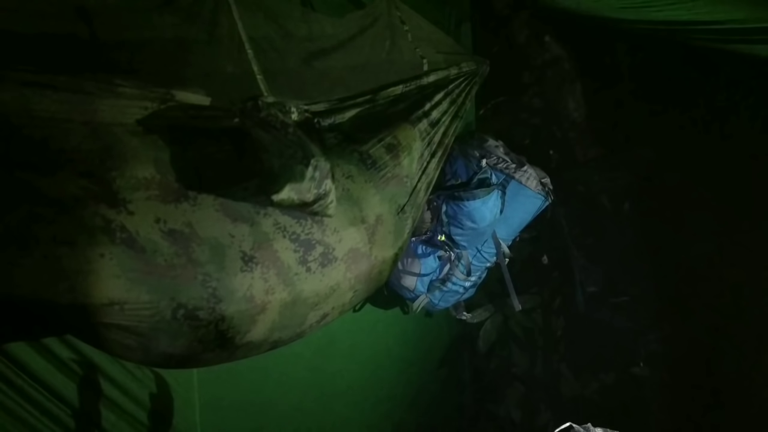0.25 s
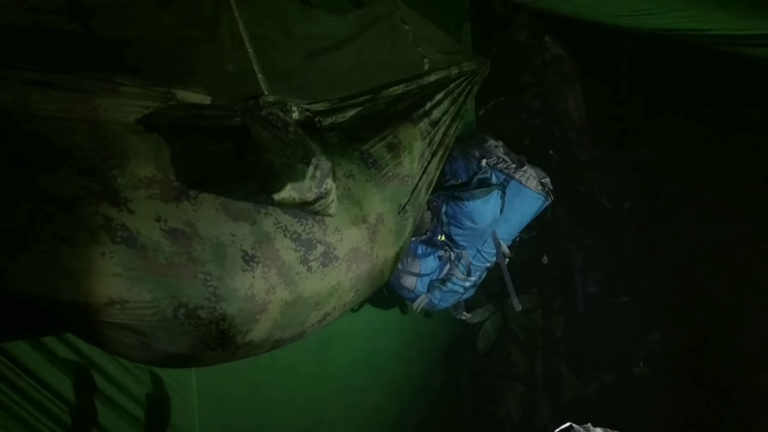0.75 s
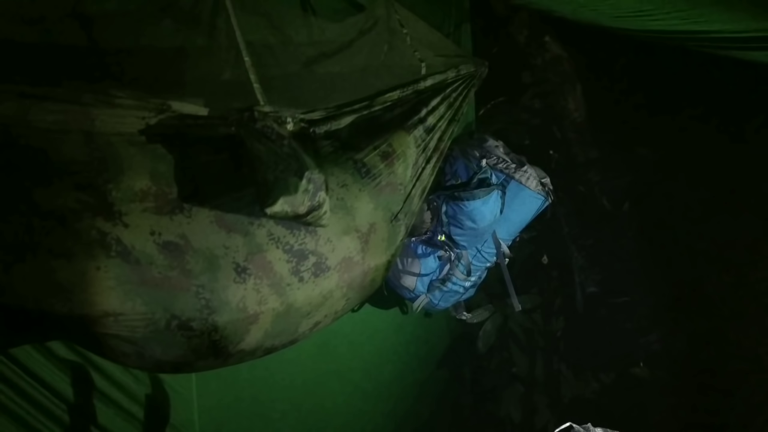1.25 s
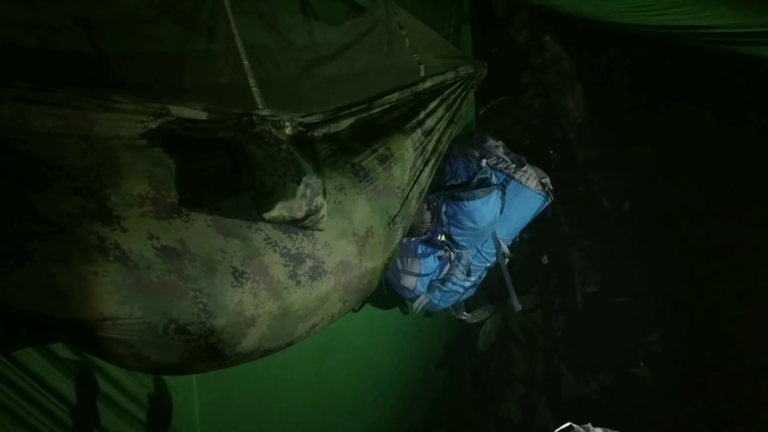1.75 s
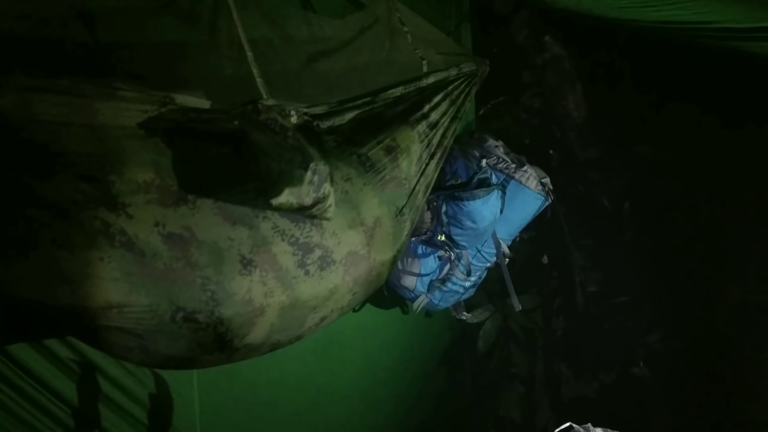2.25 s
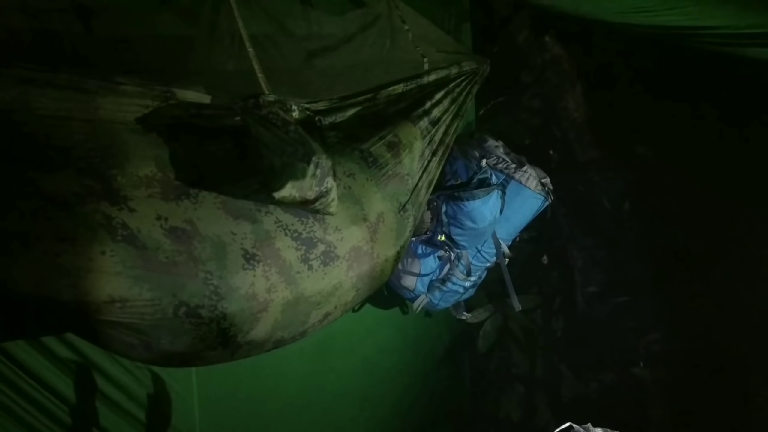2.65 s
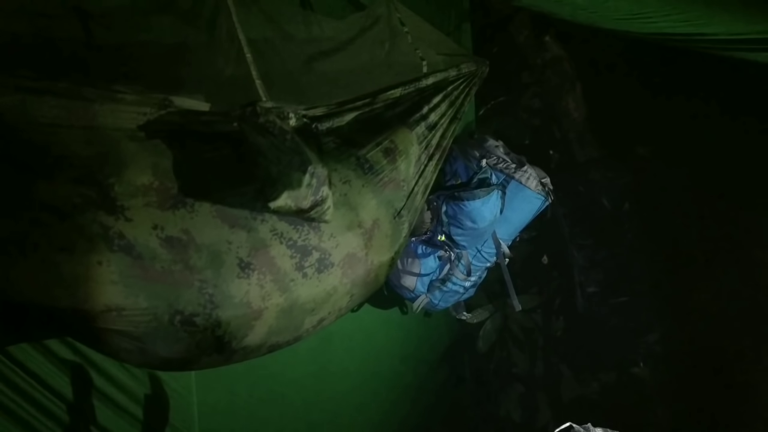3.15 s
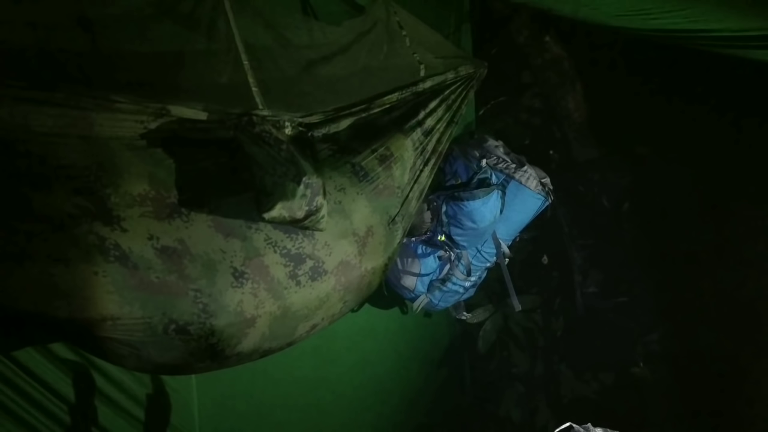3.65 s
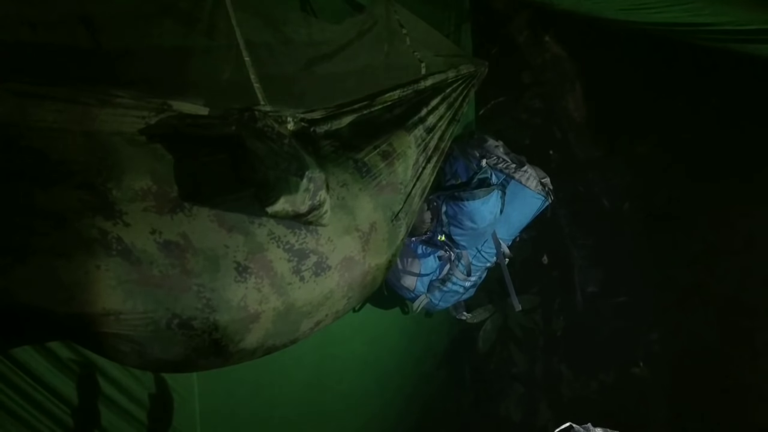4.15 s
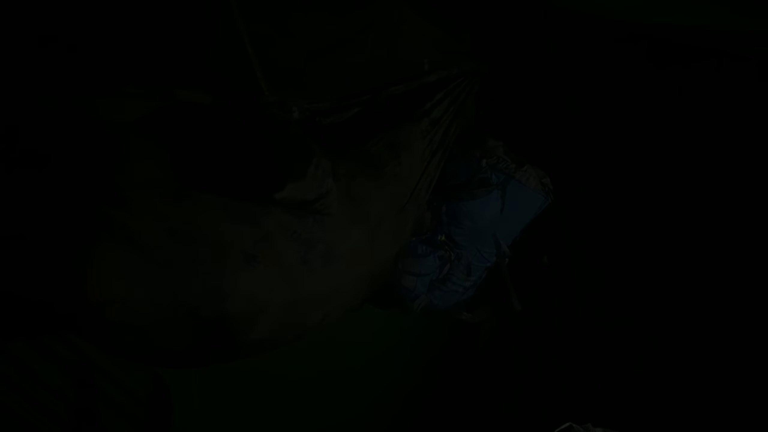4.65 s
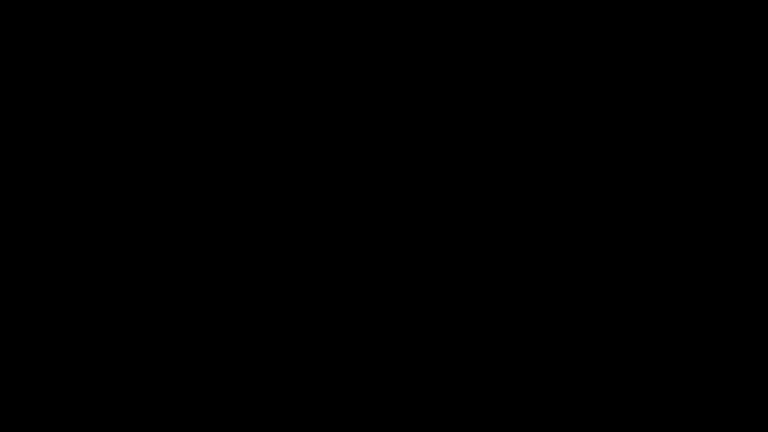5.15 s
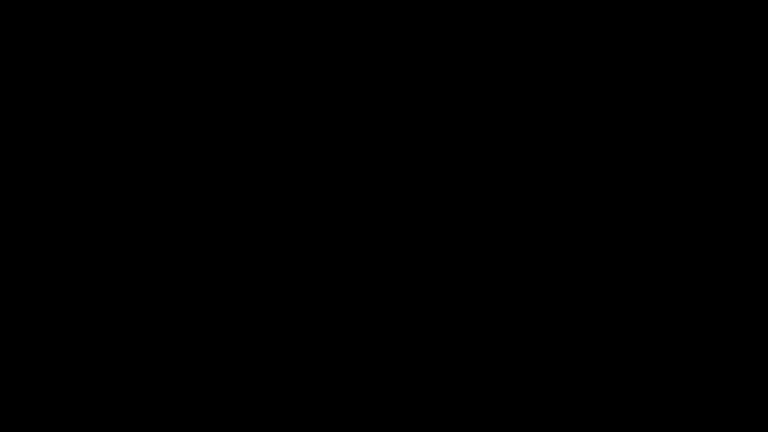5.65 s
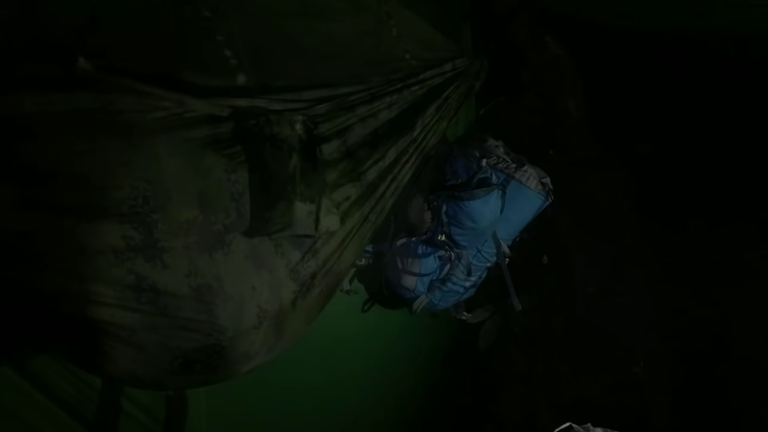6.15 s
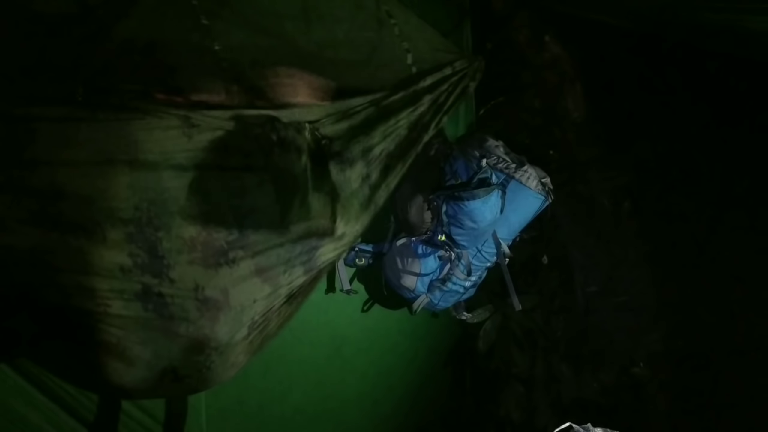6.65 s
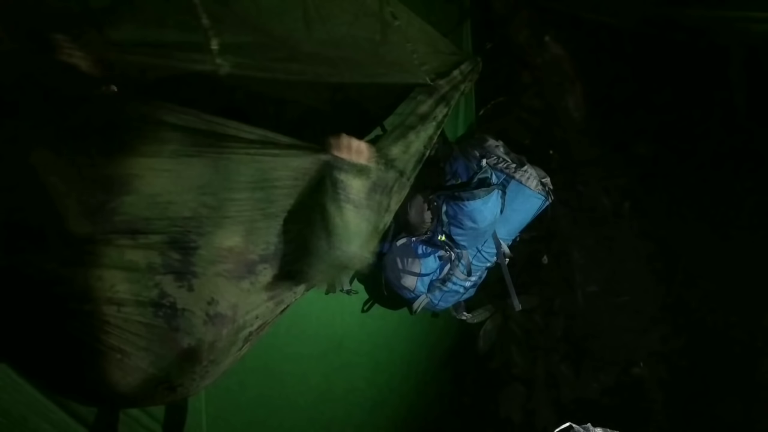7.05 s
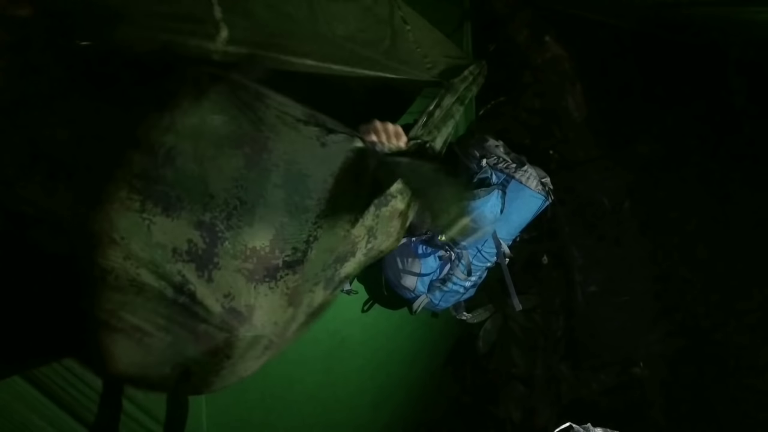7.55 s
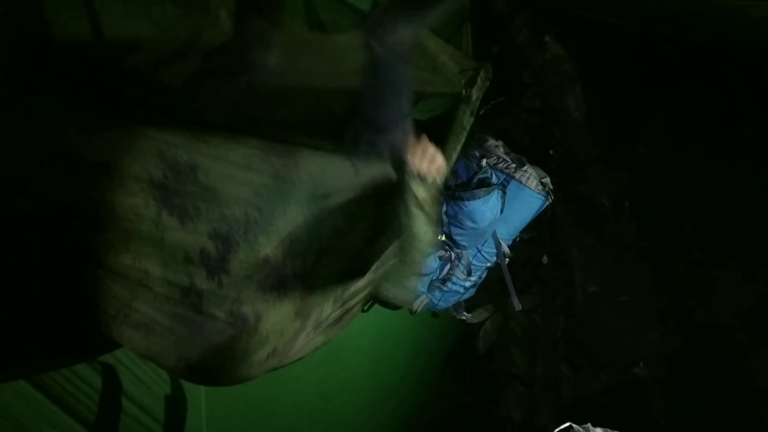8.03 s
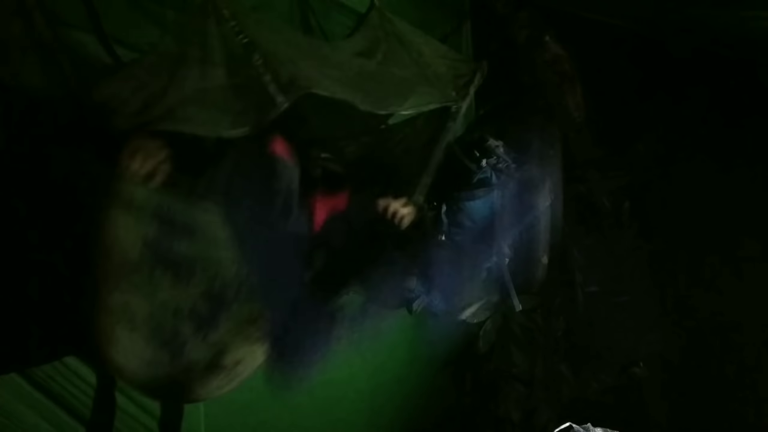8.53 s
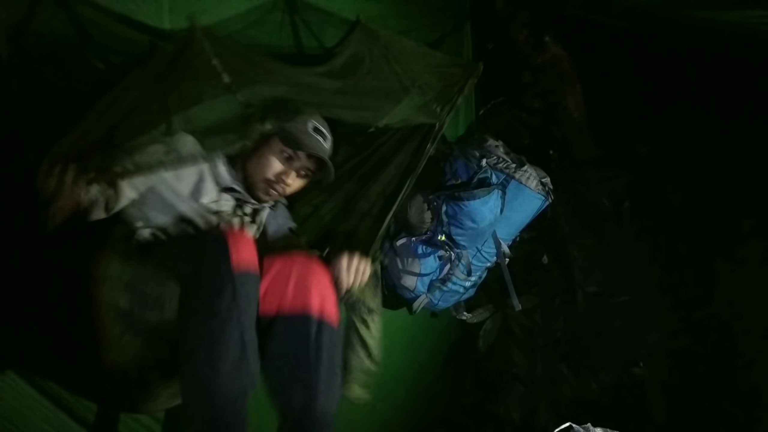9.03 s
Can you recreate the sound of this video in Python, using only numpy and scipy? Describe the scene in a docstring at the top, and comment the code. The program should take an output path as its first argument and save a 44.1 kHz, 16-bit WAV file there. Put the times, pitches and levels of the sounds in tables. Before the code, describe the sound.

A near cricket chirps over a steady insect chorus in a night forest; later someone climbs out of a swishing nylon hammock.

```python
"""A near cricket chirps in threes, one tone per wing stroke, in a forest camp at night.
Behind it: far crickets, fast-buzzing katydids, insect lisps, wide hiss, air, faint hum and rumble.
Drops tick on the leaves and the tarp. Towards the end someone climbs out of a nylon hammock:
the cloth swishes, flaps and thumps taut, the cord groans, the rigging snaps."""
import sys
import numpy as np
from scipy import signal
from scipy.fft import rfft, irfft, next_fast_len
from scipy.io import wavfile

SR = 44100
rng = np.random.default_rng(int(sys.argv[2]) if len(sys.argv) > 2 else 0)


def generate_wav(signal):
    """Clip the signal to [-1, 1] and save it as 16-bit WAV at the path in sys.argv[1]."""
    frames = np.transpose(np.atleast_2d(signal))
    scaled = np.clip(frames, -1, 1) * 32767
    pcm = np.round(scaled).astype(np.int16)
    wavfile.write(sys.argv[1], SR, pcm)


N = 409684
TIME_S = np.arange(N) / SR

# near cricket's wing stroke: offset_s, amplitude, pitch_hz
WING_STROKE = [(-.0095, 0, 5520), (-.005, .35, 5400), (-.0028, .92, 5290), (0, 1, 5230), (.003, .75, 5050),
               (.007, .5, 4900), (.011, 0, 4780)]
# runs of chirps, each chirp timed at its last stroke: first_s, last_s, peak_db, opening_stroke_rel_db
CHIRP_RUNS = [(.025, .257, -41.5, 0), (1.274, 1.274, -41.5, -6), (1.469, 2.627, -41.7, -2),
              (2.899, 3.830, -42.2, -4.5), (5.508, 5.741, -39, -11), (5.971, 6.657, -41.7, 0),
              (6.848, 7.537, -43, -1), (7.805, 8.037, -43, -10), (8.231, 8.231, -45, -22)]
STROKE_GAP_S, CHIRP_GAP_S = .0345, .231

# insect spectra: freq_hz, density_db
KATYDID_SPECTRUM = [(7400, -50), (8100, -7.5), (8700, -6), (9100, -7), (9450, -4), (9800, -6),
                    (10150, -3.5), (10400, -7.5), (10650, -12.5), (11300, -44)]
CHORUS_SPECTRUM = [(4000, -44), (4300, 1.5), (4600, -5.5), (4950, -9), (5300, -4), (5500, 5.5), (5750, -39)]
HIGH_CRICKET_SPECTRUM = [(5800, -13), (6100, -0.5), (6250, -2), (6350, -4.5), (6550, 1), (6700, -8),
                         (6850, 0.5), (7300, -33)]
LOW_CRICKET_SPECTRUM = [(2450, -40), (2750, -5), (2980, -3.5), (3120, -5.5), (3225, 5.5), (3310, -21),
                        (3550, -43)]
# far cricket levels, before swells and surge: time_s, level_db
CHORUS_LEVELS = [(0, -59.5), (1.0, -64.5), (1.3, -61), (3.8, -60.5), (4.1, -62), (4.9, -63), (5.3, -58.5),
                 (6.0, -60), (8.4, -60.5), (9.29, -63.5)]
HIGH_CRICKET_LEVELS = [(0, -64), (1.8, -63.5), (2.75, -62), (4.4, -64.5), (6.6, -62), (9.29, -64.5)]
LOW_CRICKET_LEVELS = [(0, -67), (4.4, -69), (4.8, -105), (6.2, -98), (6.6, -66.5), (7.2, -57.5), (8.3, -58),
                      (9.29, -58.5)]
# chorus beats while the near cricket rests: time_s
REST_BEATS = [.54, 4.43, 4.87, 5.2, 9.19, 9.42]

# background spectra: freq_hz, density_db
WIDE_HISS_SPECTRUM = [(150, 5.5), (500, 1.5), (1500, 2), (3500, 4.5), (5000, -20), (8000, -0.5),
                      (12000, -28), (15500, 10.5)]
AIR_SPECTRUM = [(30, -31), (110, -7.5), (220, 5.5), (310, 3.5), (420, -2), (560, 1), (900, -1),
                (2000, -1.5), (4000, -3), (7500, 0.5), (11000, -2.5), (12500, -7), (15500, -11)]
HUM_SPECTRUM = [(140, -28), (190, -9), (225, -3), (260, -7), (340, -18)]
RUMBLE_SPECTRUM = [(20, -52), (42, -22), (60, -15.5), (80, 0), (100, -2.5), (140, -8), (200, -17),
                   (400, -28.5)]
# background levels: time_s, relative_db
HUM_LEVELS = [(0, -87.5), (4.3, -84), (4.8, -75.5), (5.7, -73.5), (6.4, -83.5), (8.0, -73.5), (8.4, -70.5),
              (9.29, -70.5)]
RUMBLE_LEVELS = [(0, -69.5), (2.05, -70), (2.4, -75), (4.2, -72.5), (5.15, -100), (6.0, -100), (6.95, -77),
                 (7.2, -64), (8.1, -73), (9.29, -71)]

# drops and small twigs: start_s, knock_rel_db, knock_hz, snap_rel_db
DROPS = [(.0877, -65, 890, -61), (0.557, -64, 2620, -56.5), (1.038, -61.5, 705, -59.5),
         (1.8177, -62.5, 1140, -74), (2.9398, -63, 915, -57), (3.121, -64.5, 1110, -73),
         (3.329, -58, 1140, -54.5), (3.61, -66, 1000, -63), (4.52, -59, 2900, -60), (4.876, -72, 1500, -67),
         (4.989, -60, 1660, -56.5), (5.6775, -46.5, 1390, -49), (5.7027, -80, 1500, -56)]
# lisps of other insects: centre_s, length_s, pitch_hz, level_db
INSECT_LISPS = [(.247, .034, 12200, -55), (.288, .035, 12100, -56), (.69, .04, 7600, -68),
                (1.47, .07, 7580, -66), (2.17, .045, 7600, -63), (2.925, .051, 7730, -62)]

# hammock stirs, moves, settles: time_s, relative_db
HAMMOCK_MOTION = [(6.2, -37), (6.45, -8.5), (6.9, -6), (7.1, 2.5), (8.7, -1), (9.29, -3)]
# weight shifts pulling the nylon: peak_s, peak_rel_db, time_constant_s
NYLON_PULLS = [(6.77, -58.5, 0.12), (7.03, -55.5, 0.087), (7.24, -59, 0.072), (7.59, -52.5, 0.13),
               (8.46, -49, 0.18)]
# sliding nylon and loose cloth spectra: freq_hz, density_db
SWISH_SPECTRUM = [(900, -11.5), (1800, -8.5), (2700, -2.5), (4000, -1.5), (6000, -4), (8000, 0), (10000, 8),
                  (12000, 1), (14000, 0.5), (15500, 0)]
FLAP_SPECTRUM = [(40, -40), (90, 5.5), (150, 9), (250, 0), (400, 3), (600, 7), (1000, 2.5), (2000, -1.5),
                 (4000, -7.5)]
# thin whistles as the hammock moves: centre_s, length_s, pitch_hz, relative_db
HAMMOCK_WHISTLES = [(7.02, .17, 10700, -47), (7.08, .074, 10700, -44), (7.23, .3, 10680, -44.5),
                    (7.62, .12, 10770, -45), (7.84, 0.068, 10700, -43.5), (8.02, 0.032, 10500, -47),
                    (8.46, 0.088, 10740, -39.5), (8.86, 0.031, 10560, -48), (9.02, .035, 10750, -44.5)]
# cord tightening on the trunk: centre_s, length_s, pitch_hz, level_db
CORD_GROANS = [(7.01, .086, 470, -66), (7.09, 0.14, 350, -61.5), (7.19, .17, 576, -57),
               (7.34, .2, 150, -66)]
# cloth and cord jerking taut: start_s, note_rel_db, pitch_hz, t60_s, click_rel_db
CLOTH_THUMPS = [(7.103, -50, 730, 0.023, -53), (7.157, -48, 130, 0.054, -72), (7.253, -45, 556, .012, -52),
                (7.532, -29.5, 242, 0.012, -45.5), (7.961, -41, 483, 0.021, -60),
                (8.686, -50.5, 510, 0.021, -53), (9.143, -55.5, 910, 0.027, -56)]
# rigging resonances: centre_hz, width_hz, relative_db
RIGGING_MODES = [(455, 420, -14.5), (1550, 550, -14.5), (4300, 500, -13), (6270, 500, -9), (7650, 690, -4),
                 (8400, 760, 1.5), (12000, 5800, 0.5)]


def from_db(db):
    """Decibels to gain."""
    return 10 ** (np.asarray(db) / 20)


def unit_rms(x):
    """Scale to unit power."""
    return x / np.sqrt(np.mean(x ** 2) + 1e-20)


def decay(t, t60_s):
    """Exponential fall, 60 dB in t60_s."""
    return from_db(-60 * t / t60_s)


def gain_curve(rows):
    """Gain per sample from rows of time_s, level_db."""
    return from_db(np.interp(TIME_S, *np.transpose(rows)))


def drift(rate_hz):
    """Smooth random curve, unit power."""
    knots = rng.standard_normal(N // 8)
    return unit_rms(np.interp(TIME_S * rate_hz, np.arange(len(knots)), knots))


def colour(x, spectrum):
    """Filter by a spectrum, silent beyond its ends; unit power."""
    hz, db = np.transpose(spectrum)
    size = next_fast_len(N + 4096)
    log_hz = np.log(np.arange(size // 2 + 1) * SR / size + 1)
    shape = from_db(np.interp(log_hz, np.log(np.sort(hz)), db, left=-np.inf, right=-np.inf))
    return unit_rms(irfft(rfft(x, size) * shape, size)[..., :N])


def band(x, low_hz, high_hz):
    """Causal band-pass."""
    return signal.sosfilt(signal.butter(2, [low_hz, high_hz], "band", fs=SR, output="sos"), x)


def wide_noise(side_db):
    """Stereo white noise; side_db sets the width."""
    mid, side = rng.standard_normal((2, N))
    return mid + from_db(side_db) * side * np.array([[1], [-1]])


def add(track, start_s, sound):
    """Mix a short sound in."""
    start = round(start_s * SR)
    first, last = max(start, 0), min(start + sound.shape[-1], N)
    if last > first:
        track[..., first:last] += sound[..., first - start:last - start]


def forest_echo(x, t60_s):
    """Trunks and leaves scatter a sound into a dying tail of equal power."""
    tail = rng.standard_normal(SR) * decay(TIME_S[:SR], t60_s)
    return signal.oaconvolve(x, tail / np.linalg.norm(tail))[:N]


def rough_tones(rows, width_ratio):
    """Short swells of narrow-band noise."""
    out = np.zeros(N)
    for centre_s, length_s, hz, db in rows:
        swell = np.hanning(int(length_s * SR))
        noise = band(rng.standard_normal(SR // 2), hz * (1 - width_ratio / 2), hz * (1 + width_ratio / 2))
        add(out, centre_s - length_s / 2, from_db(db) * swell * unit_rms(noise[-len(swell):]))
    return out


def chirps(later_opening_db=-2):
    """Near chirps, evenly spaced in each run: last_stroke_s, peak_db, opening_stroke_rel_db."""
    rows = []
    for first_s, last_s, peak_db, opening_db in CHIRP_RUNS:
        times_s = np.linspace(first_s, last_s, 1 + round((last_s - first_s) / CHIRP_GAP_S))
        rows += [(s, peak_db, later_opening_db if k else opening_db) for k, s in enumerate(times_s)]
    return rows


def near_cricket(jitter_hz=35):
    """Three falling wing strokes per chirp, with a faint third harmonic and an echo off the trees."""
    offset_s, amplitude, pitch_hz = np.transpose(WING_STROKE)
    t = np.arange(offset_s[0], offset_s[-1], 1 / SR)
    envelope, glide_hz = np.interp(t, offset_s, amplitude), np.interp(t, offset_s, pitch_hz)
    out = np.zeros(N)
    for last_s, peak_db, opening_db in chirps():
        for k, stroke_db in enumerate((0, -.4, opening_db)):  # last stroke first
            phase = 2 * np.pi * np.cumsum(glide_hz + jitter_hz * rng.standard_normal()) / SR
            tone = np.sin(phase) + from_db(-23) * np.sin(3 * phase)
            start_s = last_s - k * STROKE_GAP_S + offset_s[0]
            add(out, start_s, from_db(peak_db + stroke_db) * envelope * tone)
    return out + from_db(-14) * forest_echo(out, t60_s=.95)


def trill(pitch_hz, fall_hz, strokes_per_s, scatter_hz, duty, tempo_wander):
    """Train of wing strokes; each swells, falls in pitch and starts at a new phase."""
    cycle = rng.random() + np.cumsum(strokes_per_s * np.exp(tempo_wander * drift(6))) / SR
    progress = np.minimum(cycle % 1 / duty, 1)
    glide_hz = pitch_hz + fall_hz * (.5 - progress) + scatter_hz * drift(900)
    start_turns = rng.random(4096)[cycle.astype(int)]
    tone = np.sin(2 * np.pi * (np.cumsum(glide_hz) / SR + start_turns))
    return unit_rms(np.sin(np.pi * progress) * tone)


def surge(rise_db, start_s=5.1, end_s=5.9, ramp_s=.051):
    """Gain of the one surge shared by katydids and high crickets."""
    return from_db(rise_db * np.clip(np.minimum(TIME_S - start_s, end_s - TIME_S) / ramp_s, 0, 1))


def katydids(level_db=-51):
    """Two katydids buzz at about 100 strokes/s; far ones merge into a sizzle."""
    first = trill(9650, fall_hz=1500, strokes_per_s=101, scatter_hz=330.6, duty=.6, tempo_wander=.006)
    second = trill(9800, fall_hz=1100, strokes_per_s=108, scatter_hz=300, duty=.6, tempo_wander=.006)
    pair = first + from_db(-5) * second
    sizzle = unit_rms(band(rng.standard_normal(N), 8936, 10200))
    buzz = pair + from_db(-6.5) * forest_echo(pair, t60_s=.2) + from_db(5) * sizzle
    return from_db(level_db) * surge(rise_db=3) * colour(buzz, KATYDID_SPECTRUM)


def swarm(low_hz, high_hz, fall_hz, strokes_per_s, scatter_hz, echo_db, count):
    """Far crickets, each wandering in pitch and tempo, blurred by the trees."""
    voices = np.zeros(N)
    for centre_hz in np.linspace(low_hz, high_hz, count):
        pitch_hz = centre_hz + scatter_hz * drift(20)
        voices += trill(pitch_hz, fall_hz, strokes_per_s, scatter_hz, duty=.5, tempo_wander=.15)
    return voices + from_db(echo_db) * forest_echo(voices, t60_s=.18)


def cricket_chorus(swell_db=2.8, lead_s=.031):
    """Far crickets swell in step with the near one and keep the beat through its rests."""
    beats_s = np.sort([last_s - lead_s for last_s, _, _ in chirps()] + list(REST_BEATS))
    turns = np.cumsum(np.round(np.diff(beats_s, prepend=beats_s[0]) / CHIRP_GAP_S))
    swell = from_db(swell_db * np.cos(2 * np.pi * np.interp(TIME_S, beats_s, turns)))
    voices = swarm(4720, 5150, fall_hz=520, strokes_per_s=28.5, scatter_hz=90, echo_db=3.4, count=8)
    return gain_curve(CHORUS_LEVELS) * swell * colour(voices, CHORUS_SPECTRUM)


def high_crickets():
    """Far crickets with faster strokes merge into a high trill."""
    voices = swarm(6300, 6620, fall_hz=400, strokes_per_s=45, scatter_hz=80, echo_db=0, count=6)
    return gain_curve(HIGH_CRICKET_LEVELS) * surge(rise_db=4) * colour(voices, HIGH_CRICKET_SPECTRUM)


def low_crickets_and_hiss(swell_db=1.5, period_s=1.058):
    """Low crickets swell and sink all round; a wide faint hiss shares their level curve."""
    sides = [swarm(2900, 3250, fall_hz=300, strokes_per_s=35, scatter_hz=90, echo_db=.5, count=4)
             for side in "LR"]
    crickets = colour(np.array(sides), LOW_CRICKET_SPECTRUM)
    hiss = from_db(-8.5) * colour(rng.standard_normal((2, N)), WIDE_HISS_SPECTRUM)
    swell = from_db(swell_db * np.cos(2 * np.pi * TIME_S / period_s))
    return gain_curve(LOW_CRICKET_LEVELS) * (swell * crickets + hiss)


def forest_air():
    """Steady soft air; a low hum and a rumble come and go."""
    air = from_db(-63.5) * colour(wide_noise(side_db=-55), AIR_SPECTRUM)
    hum = gain_curve(HUM_LEVELS) * colour(rng.standard_normal(N), HUM_SPECTRUM)
    rumble = gain_curve(RUMBLE_LEVELS) * from_db(-1) * colour(wide_noise(side_db=-18), RUMBLE_SPECTRUM)
    return air + hum + rumble


def far_drops(per_s=3, knock_rel_db=-68, knock_hz=995, snap_rel_db=-67):
    """Faint drops of random time, size and pitch; columns as in DROPS."""
    draws = rng.random((64, 3))[:round(per_s * N / SR)]
    return [(when * N / SR, knock_rel_db + 7 * (size - .5), knock_hz * 2 ** (pitch - .5), snap_rel_db)
            for when, size, pitch in draws]


def drop_ticks():
    """Each drop lands with a snap and sets a leaf or the tarp knocking in damped modes."""
    out, t = np.zeros(N), TIME_S[:4096]
    modes = [(.37, -12), (.66, -8), (1, -2), (2.5, -6.5)]  # pitch_ratio, relative_db
    for start_s, knock_db, knock_hz, snap_db in list(DROPS) + far_drops():
        ring = sum((-1) ** k * from_db(db) * np.sin(2 * np.pi * knock_hz * ratio * t)
                   for k, (ratio, db) in enumerate(modes))
        tail = from_db(-13) * band(rng.standard_normal(len(t)), 350, 3000) * decay(t, .1)
        knock = unit_rms(band(ring * decay(t, .013) + tail, 200, 9000))
        snap_envelope = decay(t, .0065) + from_db(-20) * decay(t, .08)
        snap = unit_rms(band(rng.standard_normal(len(t)) * snap_envelope, 2800, 12000))
        add(out, start_s, from_db(knock_db - 11.5) * knock + from_db(snap_db - 8) * snap)
    return out


def insect_lisps():
    """Short, high calls of other insects."""
    return rough_tones(INSECT_LISPS, width_ratio=.055)


def nylon_swish(creases_per_s=70, crinkle_s=.00061):
    """Nylon slides over nylon in tiny catches and crinkles; folds rub in turn, one per octave."""
    creases = (rng.random(N) < creases_per_s / SR) * np.minimum(rng.exponential(1, N), 3)
    crinkles = signal.lfilter([1], [1, -np.exp(-1 / (crinkle_s * SR))], creases)
    catches = from_db(.76 * drift(500) + 1.6 * drift(45)) * (1 + .31 * crinkles)
    folds = sum(band(wide_noise(side_db=-.3), hz, 2 * hz) * from_db(1.3 * drift(22))
                for hz in (1000, 2000, 4000, 8000))
    return colour(folds * catches, SWISH_SPECTRUM) * from_db([[-1], [1]])


def hammock_cloth(slide_rel_db=-59.5, flap_db=-64.5, flap_pull_share=.2):
    """Nylon slides and loose cloth flaps with the motion; each pull swells mainly the slide."""
    fade_in = np.clip(TIME_S - HAMMOCK_MOTION[0][0] + 1, 0, 1)
    motion = gain_curve(HAMMOCK_MOTION) * fade_in
    pull_power = sum((from_db(db) * np.exp(-np.abs(TIME_S - peak_s) / tau_s)) ** 2
                     for peak_s, db, tau_s in NYLON_PULLS)
    slide_power = from_db(slide_rel_db) ** 2
    swish = from_db(8.5) * np.sqrt(slide_power * motion ** 2 + pull_power) * nylon_swish()
    pull_swell = np.sqrt(1 + pull_power / slide_power)
    flap = colour(wide_noise(side_db=-7) * from_db(2 * drift(60)), FLAP_SPECTRUM)
    return swish + from_db(flap_db) * motion * pull_swell ** flap_pull_share * flap


def hammock_whistles():
    """Thin whistles as the hammock moves, wide and slightly right."""
    sides = [rough_tones(HAMMOCK_WHISTLES, width_ratio=.02) for side in "LR"]
    return np.array(sides) * from_db([[-1.5], [1]])


def cord_groans():
    """The cord tightens on the trunk under the weight."""
    return rough_tones(CORD_GROANS, width_ratio=.33)


def cloth_thumps(attack_s=.0011):
    """The cloth snaps taut: a damped low note under a click."""
    out, t = np.zeros(N), TIME_S[:4096]
    for start_s, note_db, pitch_hz, t60_s, click_db in CLOTH_THUMPS:
        envelope = decay(t, t60_s) * (1 - np.exp(-t / attack_s))
        note = band(np.sin(2 * np.pi * pitch_hz * t) * envelope, 76, 2000)
        click = band(rng.standard_normal(len(t)) * decay(t, .033), 360, 2900)
        add(out, start_s, from_db(note_db + 3.5) * note + from_db(click_db + 11.5) * click)
    return out


def rigging_snap(start_s=9.2108, onset_db=-36.5, crack_t60_s=.008, rattle_t60_s=.07):
    """Stiff rigging cracks close by, then rattles briefly in the same resonances."""
    out, t = np.zeros((2, N)), TIME_S[:SR // 4]
    envelope = decay(t, crack_t60_s) + from_db(1) * decay(t, rattle_t60_s)
    burst = rng.standard_normal((2, len(t))) * envelope
    crack = sum(from_db(db) * unit_rms(band(burst, hz - width_hz / 2, hz + width_hz / 2))
                for hz, width_hz, db in RIGGING_MODES)
    onset_rms = np.sqrt(np.mean(crack[:, :SR // 200] ** 2))  # first 5 ms
    add(out, start_s, from_db(onset_db) * crack / onset_rms)
    return out


def scene():
    """Insects, drops and hammock over forest air; stereo."""
    lisps = insect_lisps()
    singers = near_cricket() + katydids() + cricket_chorus() + high_crickets() + low_crickets_and_hiss()
    lisp_echo = from_db(1.5) * forest_echo(lisps, t60_s=.34)
    forest = singers + lisps + lisp_echo + forest_air() + drop_ticks()
    hammock = hammock_cloth() + cord_groans() + hammock_whistles() + cloth_thumps() + rigging_snap()
    return forest + hammock


def record(dry):
    """Steep low-pass at 15.5 kHz."""
    return signal.sosfilt(signal.ellip(12, .1, 80, 15500, fs=SR, output="sos"), dry)


dry = scene()
out = record(dry)
generate_wav(out)
```